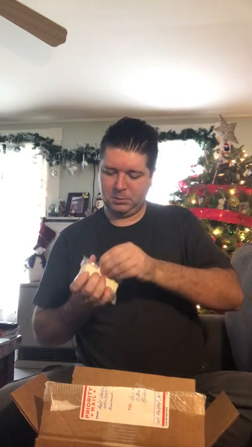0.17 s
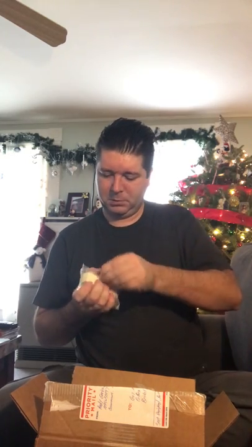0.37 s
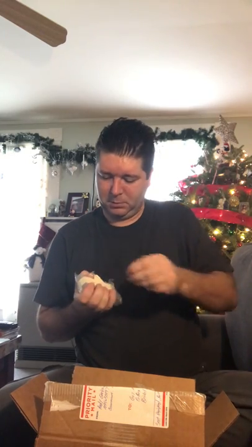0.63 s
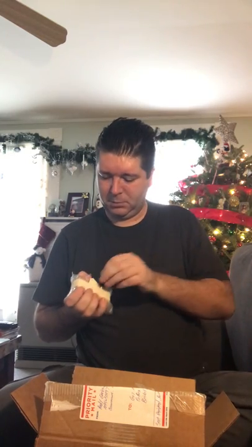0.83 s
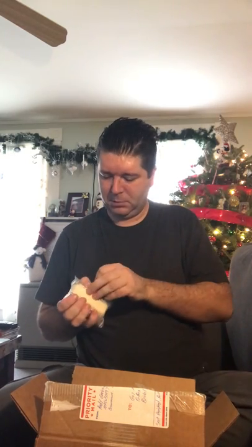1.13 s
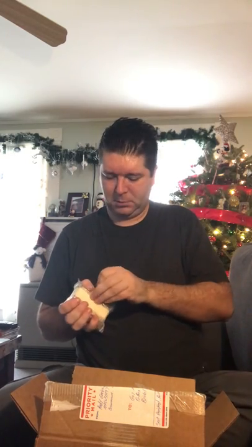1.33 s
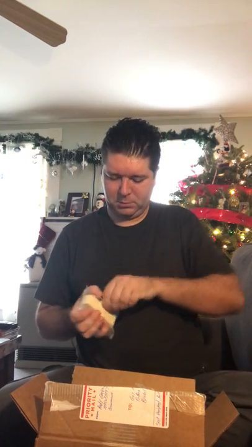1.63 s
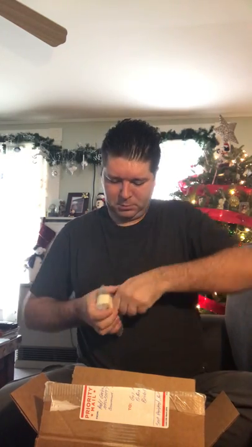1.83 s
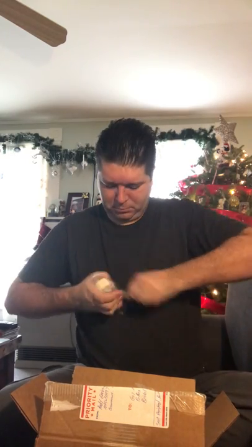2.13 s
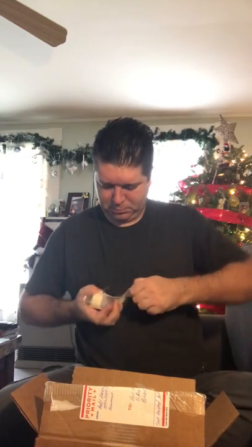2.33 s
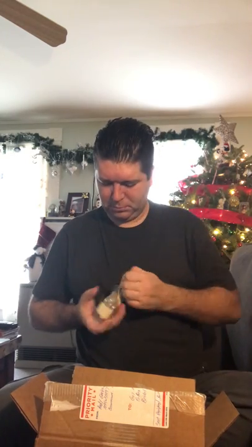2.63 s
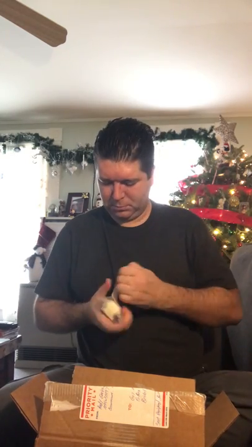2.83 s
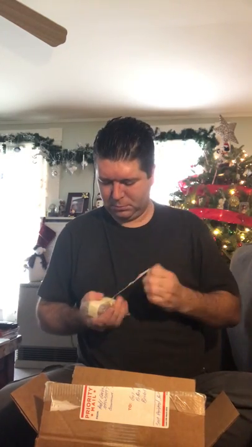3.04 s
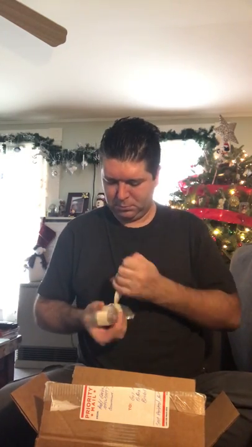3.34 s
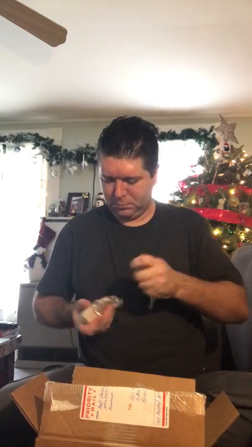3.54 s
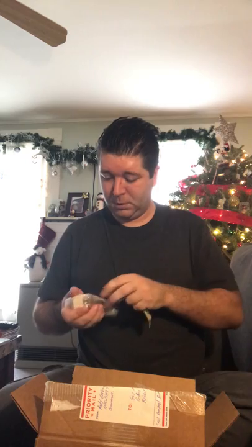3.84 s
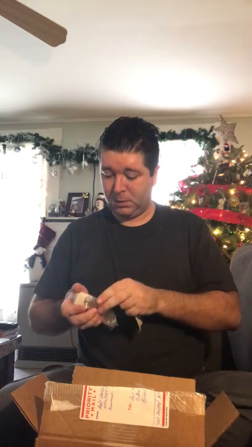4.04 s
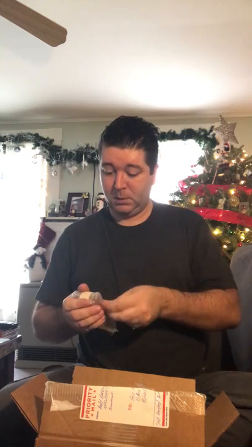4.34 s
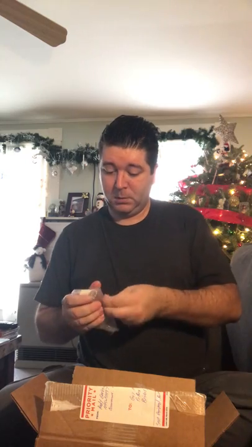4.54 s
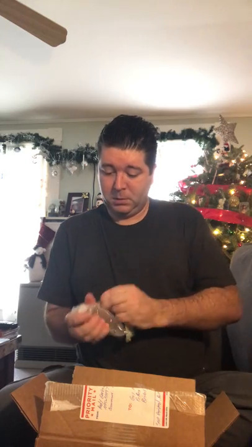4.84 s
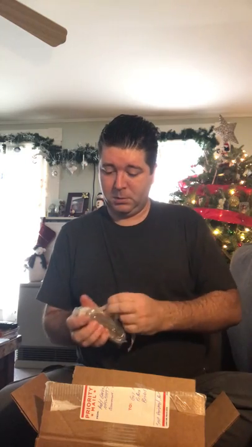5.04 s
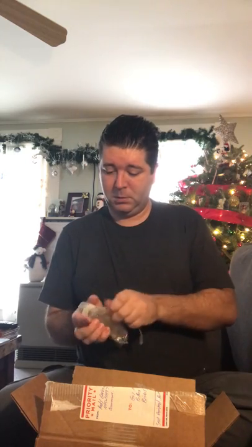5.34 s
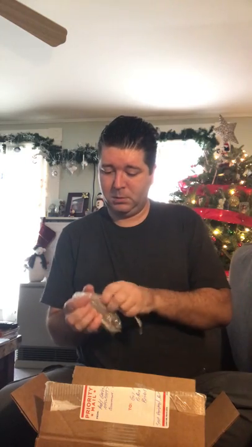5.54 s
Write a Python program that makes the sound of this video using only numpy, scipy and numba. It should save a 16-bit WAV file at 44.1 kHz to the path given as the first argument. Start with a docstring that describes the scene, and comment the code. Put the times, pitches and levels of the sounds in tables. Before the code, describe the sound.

Hands pick at stiff plastic film on a small parcel, then tear it in loud, sharp crackling bursts in a quiet furnished room.

```python
"""Tearing open a film-wrapped parcel

Hands pick at and tear stiff plastic film off a small parcel, a metre from a phone in a furnished room.
Each crease that buckles ticks and rings for a moment; a tear is a dense run of such creases. Between them
the film rustles in faint creases, a strip pops free and a sleeve brushes as filtered noise.
A table echo and a short noise tail answer over steady room noise and quiet low tones."""
import sys
import numpy as np
from scipy import signal
from scipy.fft import rfft, irfft
from scipy.io import wavfile
from scipy.ndimage import uniform_filter1d
from numba import njit

SR = 44100
rng = np.random.default_rng(int(sys.argv[2]) if len(sys.argv) > 2 else 0)


def to_wav(s):
    """Save 16-bit WAV."""
    ch = np.atleast_2d(s).T  # columns
    pcm = np.round(np.clip(ch, -1, 1) * 32767)  # PCM
    wavfile.write(sys.argv[1], SR, pcm.astype(np.int16))


N = 250838
T = np.arange(N) / SR


def undb(db):
    """Turn decibels into an amplitude factor."""
    return 10 ** (np.asarray(db) / 20)


def level(x, db):
    """Set the RMS level in dB re full scale."""
    return x * undb(db) / np.sqrt(np.mean(x ** 2))


def band(x, hz, width, order=1):
    """Band-pass around hz."""
    edges = [max(hz - width / 2, 10.), min(hz + width / 2, .48 * SR)]
    return signal.sosfilt(signal.butter(order, edges, "bandpass", fs=SR, output="sos"), x)


def wander(s, rate):
    """A random drift that heads for a new value rate times a second, gliding in between."""
    knots = np.arange(int(rate * N / SR) + 2)
    values = np.clip(rng.standard_normal(len(knots)), -2, 2)
    return np.interp(s * rate, knots, values)


def sizes(count):
    """Many small creases and few large ones."""
    return np.minimum(rng.exponential(size=count), 3.)


# steady room noise, spectral shape: f/Hz, level/dB per Hz (relative)
ROOM_NOISE = [(18, -30.5), (30, 0), (100, -7.5), (190, -8), (340, -4.5), (700, -15.5), (1300, -16),
              (2000, -25), (7000, -33), (16000, -37.5)]
ROOM_NOISE_DB = -69
# wavering appliance drone: f/Hz, width/Hz, level/dB
HUM = [(80.7, 4.9, -74.5)]
# two motors a little apart beat slowly around this pitch
MOTORS_HZ, MOTORS_DB, THROB_PER_S, THROB_PEAK_S = 119.5, -74.5, 1.66, 0.073
WHINE_HZ, WHINE_DB = 354.5, -75.5


def background():
    """Steady room and microphone noise, shaped in frequency, with a few low tones."""
    f = np.maximum(np.fft.rfftfreq(N, 1 / SR), 1)
    hz, db = np.transpose(ROOM_NOISE)
    shape = undb(np.interp(np.log(f), np.log(hz), db))
    noise = irfft(rfft(rng.standard_normal(N)) * shape, N)
    drone = sum(level(band(rng.standard_normal(N), hz, w), db) for hz, w, db in HUM)
    throb = np.cos(np.pi * THROB_PER_S * (T - THROB_PEAK_S))
    motors = np.sin(2 * np.pi * MOTORS_HZ * T) * throb
    whine_hz = WHINE_HZ + 2.5 * wander(T, 11)
    whine = np.sin(2 * np.pi * np.cumsum(whine_hz) / SR) * undb(2.5 * wander(T, 8))
    return level(noise, ROOM_NOISE_DB) + drone + level(motors, MOTORS_DB) + level(whine, WHINE_DB)


@njit
def rings(start, hz, cycles, size, rise_cycles, length):
    """Damped sines that swell over rise_cycles (time constant) and fall 60 dB in the given cycles."""
    out = np.zeros(length)
    for k in range(len(start)):
        # per-sample turn and decay of the ring, and decay of what its swell still lacks
        p = np.exp(hz[k] / SR * (2j * np.pi - np.log(1000) / cycles[k]))
        q = np.exp(-hz[k] / SR / rise_cycles)
        z, r = size[k] + 0j, 1.
        for i in range(start[k], min(length, start[k] + int(cycles[k] * SR / hz[k]))):
            out[i] += z.imag * (1 - r)
            z *= p
            r *= q
    return out


# broad resonances of the parcel: f/Hz, width/Hz, level/dB (before scaling by bandwidth)
FILM = [(463, 390, -16.5), (1274, 563, -2.5), (3406, 1960, 5.5), (5880, 1920, 7)]


def creases(s, db, hz, tick_db, ring_s, body_db, run_s=.001):
    """Each buckle rings at its own pitch; as it runs along the fold it ticks in the treble and knocks the parcel."""
    start = np.clip((s * SR).astype(np.int64), 0, N - 1)
    size = undb(db) * rng.choice([-1., 1.], len(s))
    hz = np.clip(hz, 600., 9000.)
    ring = rings(start, hz, 4 + ring_s * hz, undb(4.5) * size, 0.98, N)

    # five kicks per buckle, bunched towards its start
    delays = run_s * SR * np.sort(rng.random((len(s), 5)) ** 2)
    steps = np.clip(start[:, None] + delays.astype(np.int64), 0, N - 1).ravel()
    kicks = size[:, None] * rng.choice([-.5, .5], (len(s), 5))
    knock = np.bincount(steps, kicks.ravel(), N)
    # the first kick ticks hardest
    sharp = kicks * undb(tick_db)[:, None] * [2, .7, .5, .5, .5]
    tick = band(np.bincount(steps, sharp.ravel(), N), 10200, 16960, order=2)

    body = np.zeros(N)
    for k, (f, width, gain_db) in enumerate(FILM):
        # neighbouring resonances alternate in sign
        body += (-1) ** k * undb(gain_db) * band(knock, f, width, order=2) * 3000 / width
    # a sheet this small radiates no bass
    thin = signal.butter(3, 330, "highpass", fs=SR, output="sos")
    return signal.sosfilt(thin, ring + undb(6) * tick + undb(body_db) * body)


# film handled gently, crease level before surges and scatter: t/s, level/dB
RUSTLE = [(0, -69.5), (.12, -66), (.5, -68), (.72, -69.5), (.8, -85.5), (1.02, -75.5), (1.06, -66.5),
          (1.15, -64.5), (1.22, -72.5), (1.65, -74), (1.8, -62.5), (2.0, -75), (2.4, -58.5), (2.55, -61.5),
          (2.74, -52), (3.2, -59.5), (3.95, -69.5), (4.4, -57.5), (4.9, -67.5), (5.2, -69), (5.35, -56.5),
          (5.69, -54.5)]
# after each snap the bent film keeps crackling: level against the snap, and how fast it settles
SETTLE_DB, SETTLE_DB_PER_S = -23.5, 247


def rustle(rate=1200, scatter_db=4.5, hz=2600, spread=0.61, drift=0.47, surge_db=6.5, tick_db=-14, crisp_db=1.0):
    """Faint creases all the time, in little surges of one colour as the fingers shift, livelier just after a snap."""
    count = int(rate * N / SR)  # rate in creases per second
    s, big, off = rng.random(count) * N / SR, sizes(count), rng.standard_normal(count)
    snap_s, snap_db, _ = np.transpose(SNAPS)
    since = s[:, None] - snap_s
    settling = np.where(since > 0, snap_db + SETTLE_DB - SETTLE_DB_PER_S * since, -np.inf).max(axis=1)
    handled = np.interp(s, *np.transpose(RUSTLE)) + surge_db * wander(s, 60)
    db = np.maximum(handled, settling) + scatter_db * big
    pitch = hz * 2 ** (spread * off + drift * wander(s, 30))  # spread and drift in octaves
    return creases(s, db, pitch, tick_db + crisp_db * big, 0.00064, body_db=-4.5)


# single creases, nominal level and ring pitch: t/s, level/dB, f/Hz
SNAPS = [(0.0786, -35.5, 4870), (0.1179, -40.5, 2060), (0.165, -42, 4520), (0.2137, -56, 6000),
         (0.2254, -35.5, 8540), (0.269, -44, 1180), (0.3354, -34.5, 5930), (0.3779, -53.5, 1500),
         (0.406, -45, 3580), (0.417, -52.5, 6000), (0.4238, -52, 3820), (0.466, -51, 4000),
         (0.5229, -35, 4300), (0.643, -42, 2380), (0.6834, -49.5, 1305), (0.6978, -46, 3240),
         (1.4829, -46.5, 2460), (1.546, -40.5, 1310), (1.6021, -48.5, 6100), (1.7004, -34.5, 2920),
         (1.7234, -37.5, 5800), (1.7334, -33.5, 2050), (1.7612, -37, 1790), (1.8352, -42.5, 1760),
         (1.947, -45.5, 4800), (1.962, -39, 4530), (2.008, -31, 2980), (2.026, -34.5, 5300),
         (2.078, -31, 3800), (2.0891, -25.5, 3870), (2.0982, -33, 3420), (2.1123, -32, 3680),
         (2.1254, -21.5, 5830), (2.153, -30, 3400), (2.1608, -16, 3440), (2.1646, -6.5, 3500),
         (2.1706, -7, 3530), (2.2215, -11.5, 3420), (2.2393, -4.5, 4380), (2.2584, -10.5, 3470),
         (2.265, -3.5, 6060), (2.27, -9.5, 5730), (2.2942, -31, 3080), (2.4606, -36.5, 4390),
         (2.4674, -30, 3230), (2.6162, -42, 3060), (2.6437, -33.5, 2660), (2.75, -28.5, 3730),
         (2.7558, -29.5, 5930), (2.7634, -19, 3900), (2.8093, -19.5, 4300), (2.8346, -23, 4270),
         (2.8907, -17.5, 2300), (2.9132, -13.5, 3530), (2.9548, -15.5, 2600), (3.007, -33.5, 5700),
         (3.0347, -22.5, 3200), (3.049, -14, 1390), (3.0635, -12.5, 3080), (3.1125, -17, 4600),
         (3.1187, -14, 5900), (3.2655, -36, 3430), (3.4885, -21, 3330), (3.518, -32, 1299),
         (3.5305, -21.5, 6200), (3.5622, -21.5, 1130), (3.6707, -36.5, 775), (3.702, -39, 4410),
         (4.0101, -55, 5000), (4.05, -55, 5990), (4.1065, -54, 5880), (4.1468, -47.5, 3350),
         (4.1754, -44.5, 3900), (4.2651, -32.5, 6060), (4.3806, -38, 3450), (4.3982, -33.5, 4660),
         (4.4544, -39.5, 6540), (4.464, -48, 3070), (4.482, -47, 5470), (4.5419, -41.5, 3770),
         (4.607, -32, 3160), (4.6287, -40, 1045), (4.6659, -38.5, 2440), (4.6902, -29.5, 4300),
         (4.7236, -34, 6500), (4.739, -24.5, 3660), (4.748, -27, 4560), (4.7722, -21, 2350),
         (4.8396, -29, 1848), (4.8928, -49, 5430), (4.9376, -32, 1620), (4.9486, -25.5, 2010),
         (4.994, -32, 3250), (5.0272, -35, 3900), (5.0554, -31.5, 1310), (5.0933, -33, 816),
         (5.1166, -26.5, 2726), (5.1454, -27, 1420), (5.2324, -36, 1276), (5.2592, -31, 1200),
         (5.3112, -41, 1420), (5.3436, -37, 3040), (5.4225, -39, 3050), (5.5066, -45, 1340),
         (5.5163, -35.5, 3100), (5.6009, -37, 4370)]


def snaps(tick_db=-7, after_s=0.0055, crisp_db_per_octave=3.5, crisp_db_per_db=0.065):
    """The creases one can point at; each is followed by six smaller slips within milliseconds."""
    s, db, hz = np.transpose(SNAPS)
    # higher and stronger creases break more crisply
    ticks_db = tick_db + crisp_db_per_octave * np.log2(hz / 3000) + crisp_db_per_db * (db + 27)
    main = creases(s, db, hz, ticks_db, 0.0016, body_db=-1.0)

    late, small, pitch = rng.random((len(s) * 6, 3)).T
    s, db, hz, ticks_db = (np.repeat(c, 6) for c in (s, db, hz, ticks_db))
    slip_db = db - 10.5 - 9 * late - 6 * small
    slip_hz = hz * 2 ** (1.4 * (pitch - .5))
    slips = creases(s + after_s * late, slip_db, slip_hz, ticks_db - 0.5, 0.0022, body_db=2.0)
    return main + slips


POP_S, POP_CRACK_DB, POP_CRACK_T60_S = .5412, -23, 0.021
# ringing modes of the knocked parcel and palm: f/Hz, level/dB (before the swell), fall by 60 dB/cycles
POP = [(315, -35.5, 19), (426, -23.5, 10.3), (1055, -17.5, 14.6), (1276, -14.5, 12.7), (2980, -18.5, 11),
       (4460, -5.5, 12)]


def pop():
    """A strip lets go: a broad noise crack, and damped modes as it knocks parcel and palm."""
    hz, db, cycles = np.transpose(POP)
    knock = rings(np.full(len(hz), int(POP_S * SR)), hz, cycles, undb(db), 0.92, N)
    since = T - POP_S
    decay = (since > 0) * undb(POP_CRACK_DB - 60 * np.abs(since) / POP_CRACK_T60_S)
    crack = decay * level(band(rng.standard_normal(N), 2880, 3670, order=2), 0)
    return knock + crack


# tearing runs, crease levels before surges and scatter:
# start t/s, length t/s, first level/dB, last level/dB, ring f/Hz, hand thud against crease level/dB
TEARS = [(2.087, 0.047, -49.5, -43, 3620, -44), (2.235, 0.065, -21.5, -28.5, 3150, -32),
         (2.803, 0.042, -36, -43.5, 4030, -40), (2.886, 0.095, -33, -45, 1980, -31),
         (3.037, 0.092, -31.5, -34, 3080, -18), (3.486, 0.089, -37.5, -41, 2600, -6.5),
         (4.713, 0.097, -51.5, -70, 2400, -9), (4.934, 0.053, -45.5, -44, 2030, -29),
         (5.059, 0.02, -43.5, -47, 1400, -7.5)]


def tears(rate=1300, scatter_db=3.5, spread=0.22, drift=0.49, surge_db=3, crisp_db=-0.5, tick_db=-3):
    """Dense creases along each tear, drifting in pitch as the free flap changes; the jerking hand adds a low thud."""
    rows, thud = [], np.zeros(N)
    for start, length, first_db, last_db, hz, thud_db in TEARS:
        count = int(rate * length)  # rate in creases per second
        at, big, off = rng.random(count), sizes(count), rng.standard_normal(count)
        db = first_db + (last_db - first_db) * at + scatter_db * big
        # crease size also shifts the tick against the ring
        rows.append([start + length * at, db, hz * 2 ** (spread * off), tick_db + crisp_db * big])
        u = (T - start) / length  # progress along the tear, 0 to 1
        run_db = first_db + (last_db - first_db) * np.clip(u, 0, 1)
        thud += ((u > 0) & (u < 1)) * undb(run_db + thud_db)
    s, db, hz, ticks_db = np.concatenate(rows, axis=1)
    low = level(band(rng.standard_normal(N), 420, 500, order=2), -2.4)
    surging_db = db + surge_db * wander(s, 150)
    drifting_hz = hz * 2 ** (drift * wander(s, 60))
    film = creases(s, surging_db, drifting_hz, ticks_db, 0.0018, body_db=1)
    # smoothing over 300 samples softens the edges of the thud
    return film + uniform_filter1d(thud, size=300) * low


# a sleeve brushes while the arm pulls: start t/s, end t/s, level/dB
SLIDES = [(2.347, 3.958, -67)]
SLIDE_BAND = (3700, 7500)  # centre and width, Hz


def slides(fade_s=0.022, waver_db=1):
    """A soft, nearly even hiss of band-passed noise while the sleeve slides."""
    gate = sum(((T > start) & (T < end)) * undb(db) for start, end, db in SLIDES)
    hiss = level(band(rng.standard_normal(N), *SLIDE_BAND), 0)
    return uniform_filter1d(gate, int(fade_s * SR)) * undb(waver_db * wander(T, 19)) * hiss


TABLE_ECHO_S, TABLE_ECHO_DB = .0038, -23.5
# diffuse room answer by band: f/Hz, fall by 60 dB t/s, level/dB (relative)
TAIL = [(279, 0.22, -19.5), (1312, 0.19, -18), (3220, 0.19, -16.5), (7000, 0.2, -14.5), (10200, 0.061, 0.5)]


def room(x):
    """An echo off the table top, then a short diffuse noise tail that dies fastest at the very top."""
    t = np.arange(SR // 2) / SR
    rise = np.clip((t - .002) / .005, 0, 1)  # the tail fades in from 2 to 7 ms
    answer = np.zeros(len(t))
    for hz, t60, db in TAIL:
        noise = level(band(rng.standard_normal(len(t)), hz, 1.24 * hz, order=2), db - 30.5)
        answer += noise * rise * undb(-60 * t / t60)
    answer[0] += 1  # direct sound
    answer[int(TABLE_ECHO_S * SR)] += undb(TABLE_ECHO_DB)
    return signal.fftconvolve(x, answer)[:N]


def scene():
    """Everything the hands do sounds in the room; the background lies over it."""
    handling = snaps() + pop() + tears() + rustle() + slides()
    return (room(handling) + background())[None, :]


def record(dry):
    """The phone rounds the loudest peaks and cuts the top above 15850 Hz."""
    rounded = np.tanh(1.1 * dry) / 1.1
    top_cut = signal.ellip(12, .2, 100, 15850, fs=SR, output="sos")
    return signal.sosfilt(top_cut, rounded)


dry = scene()
out = record(dry)
to_wav(out)
```